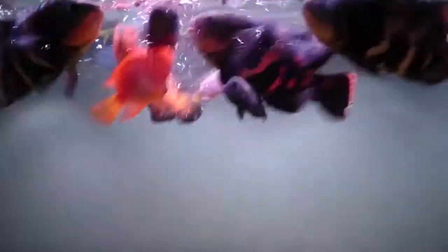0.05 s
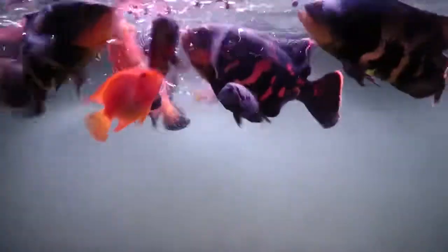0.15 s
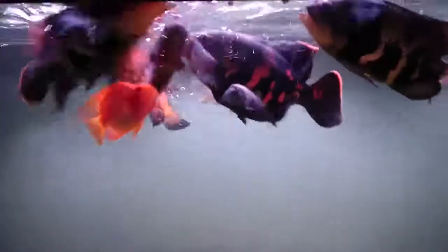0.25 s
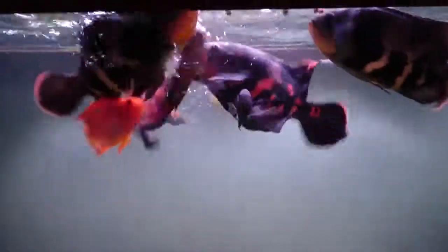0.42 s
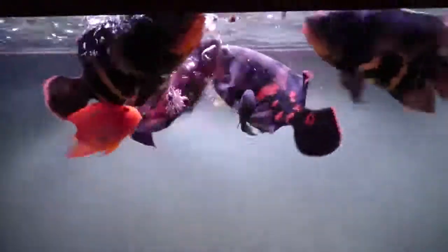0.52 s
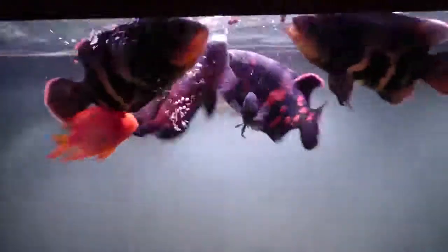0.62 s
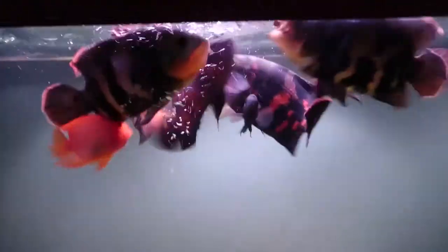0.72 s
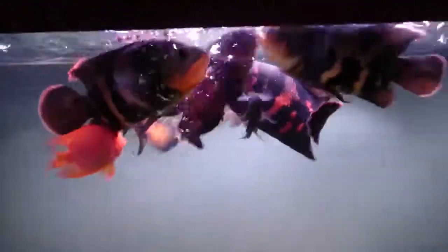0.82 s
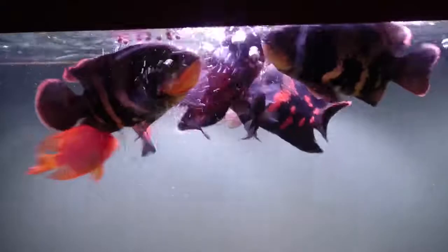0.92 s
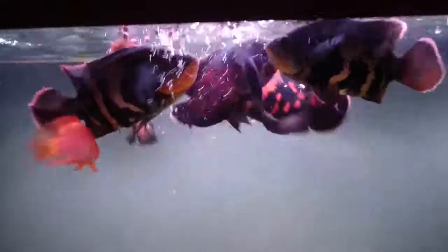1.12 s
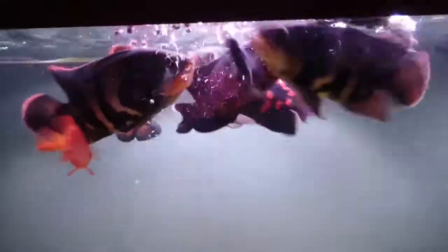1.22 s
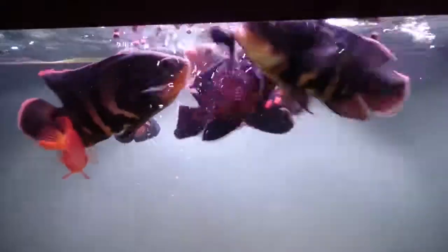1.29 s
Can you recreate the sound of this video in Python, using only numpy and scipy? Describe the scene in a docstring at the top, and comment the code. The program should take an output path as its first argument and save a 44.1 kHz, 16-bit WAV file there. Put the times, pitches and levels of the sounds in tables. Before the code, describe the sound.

Large fish splash and snap at the surface of an aquarium over faint equipment hiss

```python
"""Aquarium, feeding time: big fish lunge at the surface, throwing up short clouds of bubbles and spray.
Splashes, falling drops and single bubbles are damped sines; jaw snaps add a noise crack to the ring.
The air space over the water and a small hard room ring on. A filtered-noise thump bumps the tank.
Equipment hisses quietly as coloured noise; the left microphone is weak below the treble."""
import sys
import numpy as np
from scipy import signal
from scipy.fft import rfft, irfft, next_fast_len
from scipy.io import wavfile
from scipy.ndimage import map_coordinates

SR = 44100
rng = np.random.default_rng(int(sys.argv[2]) if len(sys.argv) > 2 else 0)


def file_out(sig):
    """Save sig as 16-bit WAV at sys.argv[1]."""
    # one column per channel
    cols = np.atleast_2d(sig).T
    # limit, then scale
    lim = np.clip(cols, -1, 1)
    pcm = np.round(lim * 32767).astype(np.int16)
    wavfile.write(sys.argv[1], SR, pcm)


N = 59535

# Source levels are ahead of the space and the tank colour.
# Water thrown by lunges. Each row: start in seconds, length in seconds, level in dB, centre pitch in Hz,
# pitch spread in octaves, ring of each tiny bubble in cycles per 60 dB.
SPLASH_CLOUDS = [(.177, 0.015, -42, 1680, 0.042, 24), (0.19, 0.018, -39.5, 5100, 0.47, 4.4),
                 (.2055, 0.011, -24.5, 846, 0.065, 15), (0.21, .016, -24.5, 1380, 0.31, 12),
                 (0.21, .016, -29.5, 3620, .09, 22), (.2115, 0.0099, -25.5, 6260, 0.59, 9.4),
                 (0.22, 0.0082, -25.5, 2160, 0.093, 18), (.238, .035, -32, 2040, 0.41, 14),
                 (.236, .04, -34, 3460, 0.12, 26), (0.299, .030, -37.5, 1820, 0.13, 6.7),
                 (.391, .016, -24.5, 1090, 0.732, 11.3), (.393, .014, -28.5, 873, 0.093, 17),
                 (.3915, 0.011, -25.5, 3460, 0.27, 9.5), (.3985, .004, -20.5, 6460, 0.41, 10.4),
                 (.42, .016, -32.5, 4300, 0.66, 2.5), (.418, 0.049, -30, 3620, 0.043, 68),
                 (.415, .04, -34, 3090, 0.044, 50), (0.49, 0.062, -45, 3450, 0.095, 60),
                 (0.77, 0.016, -27.5, 628, 0.62, 5.6), (.779, .018, -30.5, 747, .17, 22),
                 (0.78, .018, -25, 2810, 0.6, 12.8), (0.78, .010, -34, 9100, 0.43, 5.1),
                 (.784, .03, -32, 4240, 0.056, 36), (0.79, .030, -31, 3280, 0.67, 7.1),
                 (0.674, 0.028, -49, 7300, 0.053, 9.4), (1.216, 0.016, -42.5, 1600, 0.24, 15),
                 (1.212, 0.051, -44.5, 7730, 0.066, 10), (1.217, .013, -43.5, 3020, 0.042, 32),
                 (1.25, 0.015, -39, 960, 0.36, 13.5), (1.249, .028, -41.5, 3500, 0.15, 22),
                 (1.252, 0.055, -41, 4200, 0.044, 76), (1.264, 0.01, -41, 1700, 0.17, 13),
                 (1.236, 0.081, -39, 658, 0.018, 35), (1.287, 0.059, -47, 3700, 0.19, 12)]
# Jaw snaps and sharp slaps. Each row: start in seconds, level in dB, ring pitch in Hz,
# crack over the ring in dB.
JAW_SNAPS = [(0.2138, -38, 4700, 5), (0.2448, -33.5, 3380, -16), (.3985, -28, 3200, -24),
             (0.3998, -24, 3430, -4), (.402, -32.5, 3330, 4.5), (0.4113, -34, 3750, 0),
             (0.4219, -37, 3200, -7), (0.4287, -28, 3240, -22), (0.7856, -26, 3630, -9.5),
             (1.2603, -39.5, 4030, -9)]
# Single bubbles. Each row: start in seconds, level in dB, starting pitch in Hz, t60 in seconds.
SINGLE_BUBBLES = [(.187, -38.5, 1690, 0.014), (.209, -32, 850, 0.011), (.223, -41, 1660, 0.017),
                  (.555, -47.5, 3480, 0.0074), (.643, -50, 3720, 0.018), (.829, -38, 2475, 0.028),
                  (.997, -49, 681, 0.084), (1.226, -45.5, 3090, 0.027)]
# Drops falling back after big lunges. Each row: start in seconds, level of the first drops in dB.
DROP_SHOWERS = [(0.252, -41.5), (.43, -36.5), (0.799, -45)]
# Modes of the air space over the water. Each row: frequency in Hz, level in dB re HOOD_DB, t60 in seconds.
HOOD_MODES = [(342, 3, 0.16), (491.6, 2.5, 0.23), (852.5, 6.5, 0.2), (1265, 6, 0.29), (1522, -2, 0.28),
              (1617, 2, 0.31), (2195, 8.5, 0.35), (2508, 7, 0.18), (2920, 7, 0.39), (3200, 0.5, 0.25),
              (3510, 5, 0.61), (3664, 6, 0.26), (3730, 4, 0.4), (4660, 1, 0.22), (5350, -11, 0.43),
              (5780, 7, 0.21)]
# Reflections from the glass and the lid. Each row: mean delay in seconds, level in dB re the direct sound.
WALL_ECHOES = [(.0011, -19.5), (.0019, -8.5), (.0047, -8), (.0082, -11), (0.0124, -20), (0.0192, -17)]
# Decay of the room's tail. Each row: frequency in Hz, t60 in seconds.
ROOM_DECAY = [(200, 0.17), (530, 0.49), (1400, 0.43), (3600, 0.32), (9700, 0.33)]
# Colour of the water sounds. Each row: frequency in Hz, gain in dB.
TANK_COLOUR = [(100, -6.5), (250, -5.5), (500, -8), (800, -5), (1100, -7.5), (1600, 0), (1950, -5.5),
               (2200, -2), (2600, -3), (2820, -3), (3000, -0.5), (3800, -2), (4250, -3.5), (4700, -3),
               (5500, -7), (5800, -6), (7200, -6), (9500, -9), (11500, -20), (15000, -8)]
# Shape of the equipment noise spectrum. Each row: frequency in Hz, relative density in dB per Hz.
HISS_COLOUR = [(25, -14), (70, -10), (140, -15), (300, -8), (500, -1.5), (680, -0.5), (1050, 0), (1400, 2),
               (2300, 0), (3700, 1.5), (4200, -3.5), (4800, -17), (7500, -16), (10000, -24.5), (11500, -37),
               (15000, -25.5)]
# Slow swell of the equipment noise. Each row: time in seconds, gain in dB.
HISS_SWELL_POINTS = [(0, 1.5), (0.132, 2), (.25, 0.5), (.7, 0), (.9, 0.5), (1.1, -1), (1.35, 2)]
# Sensitivity of the left microphone. Each row: frequency in Hz, gain in dB.
LEFT_MIC_RESPONSE = [(120, -2), (300, -8), (700, -12.5), (1500, -15.5), (2500, -18), (5000, -16.5),
                     (5300, 0), (15000, 0)]

HISS_DB, HISS_WAVER_DB, HISS_WAVER_POINTS_PER_S = -53.5, 1.07, 25
GRAINS_PER_S, GRAIN_SCATTER_DB, GRAIN_ATTACK_CYCLES = 5000, 4.5, 0.21
SWELL_SHARE = 0.19  # part of a splash over which it builds from half to full strength
BUBBLE_RISE_PER_T60, BUBBLE_ATTACK_S = 0.049, 0.001  # rise as a fraction of the pitch
SNAP_T60_S, CRACK_T60_S, CRACK_TOP_HZ = 0.0035, 0.011, 6200
DRIZZLE_S, DRIZZLE_FADE_DB_PER_S, DROP_SCATTER_DB = 0.16, 85, 2
DROP_HZ, DROP_SPREAD_OCTAVES, DROP_CYCLES = 3240, 0.39, 5
THUMP_S, THUMP_DB, THUMP_T60_S, THUMP_TOP_HZ = 1.131, -58.5, 0.32, 218
THUMP_PAN_DB = 3  # left up, right down
HOOD_DB, ROOM_DB, ROOM_BUILD_S = -9, 0.5, 0.0054
WALL_SCATTER, LEFT_LAG_S = 0.11, 0.0003  # paths to the two microphones differ; scatter is a share of the delay
LOW_CUT_HZ = 556  # small splashes radiate little bass
ALIKE = 0.017  # left-right correlation of diffuse noise
TOP_HZ = 15500


def amp(db):
    """Decibels to gain."""
    return 10 ** (np.asarray(db) / 20)


def unit(x):
    """Scale to rms 1."""
    return x / np.sqrt(np.mean(x ** 2) + 1e-20)


def burst(x):
    """Scale a short sound to the energy of 10 ms at rms 1."""
    return x / np.sqrt(np.sum(x ** 2) / (SR / 100) + 1e-20)


def along(points, hz):
    """Read (Hz, value) points on a log axis."""
    f, v = np.transpose(points)
    return np.interp(np.log(hz + 1), np.log(f + 1), v)


def fade(t, t60):
    """Exponential decay, 60 dB in t60."""
    return np.exp(-np.log(1000) * t / t60)


def add(track, s, x):
    """Mix x into the track at time s."""
    part = track[max(round(s * SR), 0):][:len(x)]
    part += x[:len(part)]


def coloured(x, points):
    """Minimum-phase filter, by folded cepstrum, with a gain of (Hz, dB) points."""
    m = 2 * next_fast_len(N)
    gain = amp(along(points, np.fft.rfftfreq(m, 1 / SR)))
    cepstrum = irfft(np.log(gain), m)
    cepstrum[1:m // 2] *= 2
    cepstrum[m // 2 + 1:] = 0
    return irfft(rfft(x, m) * np.exp(rfft(cepstrum)), m)[..., :N]


def diffuse(size):
    """White noise for two microphones, correlated by ALIKE."""
    a, b = rng.standard_normal((2, size))
    u = np.arccos(ALIKE) / 2
    shared, opposed = np.cos(u) * a, np.sin(u) * b
    return np.array([shared + opposed, shared - opposed])


def equipment():
    """Equipment rush: coloured noise with a slow swell and a slight random waver in level."""
    waver = map_coordinates(rng.standard_normal(size=64), [np.arange(N) * HISS_WAVER_POINTS_PER_S / SR])
    swell_db = np.interp(np.arange(N) / SR, *np.transpose(HISS_SWELL_POINTS))
    level = amp(HISS_DB + swell_db + HISS_WAVER_DB * waver)
    return level * unit(coloured(diffuse(N), HISS_COLOUR))


def grain(t, hz, cycles):
    """One tiny bubble or drop: a damped sine with a soft start."""
    attack = 1 - np.exp(-t * hz / GRAIN_ATTACK_CYCLES)
    return burst(np.sin(2 * np.pi * hz * t) * fade(t, cycles / hz) * attack)


def splashes():
    """Each splash is a swelling cloud of tiny damped bubbles at its own spot on the surface."""
    out, t = np.zeros((2, N)), np.arange(SR // 25) / SR
    for s, length, db, centre_hz, spread, cycles in SPLASH_CLOUDS:
        when = rng.random(size=256)  # share of the splash length
        pitch, strength, sign = rng.standard_normal((3, len(when)))
        swell = np.minimum(0.5 + when / (2 * SWELL_SHARE), 1)
        size = np.sign(sign) * amp(GRAIN_SCATTER_DB * strength) * swell
        cloud, spot = np.zeros(SR // 6), np.zeros(N)
        for k in range(int(np.clip(length * GRAINS_PER_S, 1, len(when)))):
            hz = min(centre_hz * 2 ** (spread * pitch[k]), TOP_HZ)
            add(cloud, when[k] * length, size[k] * grain(t, hz, cycles))
        add(spot, s, amp(db) * burst(cloud))
        out += space(spot)
    return out


def space(x):
    """Direct sound, near reflections, the ringing air space and the room's tail, new paths at each call."""
    t = np.arange(SR // 2) / SR
    hz, frames, z = signal.stft(diffuse(len(t)), SR, nperseg=256)
    z = z * fade(frames, along(ROOM_DECAY, hz)[:, None])
    tail = signal.istft(z, SR, nperseg=256)[1][:, :len(t)]
    tail *= 1 - np.exp(-t / ROOM_BUILD_S)
    response = amp(ROOM_DB) * tail / np.linalg.norm(tail[0])
    for side, lag in zip(response, (LEFT_LAG_S, 0)):
        add(side, lag, np.ones(1))  # direct sound
        for delay, db in WALL_ECHOES:
            add(side, delay * (1 + WALL_SCATTER * rng.standard_normal()), amp([db]))
        for f, db, t60 in HOOD_MODES:
            mode = np.sin(2 * np.pi * (f * t + rng.random())) * fade(t, t60)
            per_sample = 10 * np.log(1000) / (t60 * SR)  # equal peak gain for any t60
            side += amp(HOOD_DB + db) * per_sample * mode
    return signal.fftconvolve(x[None], response, axes=1)[:, :N]


def bubbles():
    """Larger bubbles start softly, ring alone and rise a little in pitch."""
    out, t = np.zeros(N), np.arange(SR // 8) / SR
    for s, db, hz, t60 in SINGLE_BUBBLES:
        phase = 2 * np.pi * hz * (t + BUBBLE_RISE_PER_T60 * t ** 2 / (2 * t60))
        attack = 1 - np.exp(-(t / BUBBLE_ATTACK_S) ** 2)
        add(out, s, amp(db) * burst(np.sin(phase) * fade(t, t60) * attack))
    return out


def snaps():
    """A jaw shuts: a broad noise crack and a short damped ring."""
    out, t = np.zeros(N), np.arange(SR // 50) / SR
    soften = signal.butter(2, CRACK_TOP_HZ, fs=SR, output='sos')
    for s, db, hz, crack_db in JAW_SNAPS:
        ring = burst(np.sin(2 * np.pi * hz * t) * fade(t, SNAP_T60_S))
        noise = rng.standard_normal(len(t)) * fade(t, CRACK_T60_S)
        crack = burst(signal.sosfilt(soften, np.diff(noise, prepend=0)))
        add(out, s, amp(db) * (ring + amp(crack_db) * crack))
    return out


def drizzle():
    """Scattered drops fall back, on the whole ever fainter, each a short damped ring."""
    out, t = np.zeros(N), np.arange(SR // 50) / SR
    for s, first_db in DROP_SHOWERS:
        times = rng.random(size=12) * DRIZZLE_S
        for when, pitch, strength in zip(times, *rng.standard_normal(size=(2, 12))):
            hz = min(DROP_HZ * 2 ** (DROP_SPREAD_OCTAVES * pitch), TOP_HZ)
            db = first_db - DRIZZLE_FADE_DB_PER_S * when + DROP_SCATTER_DB * strength
            add(out, s + when, amp(db) * grain(t, hz, DROP_CYCLES))
    return out


def thump():
    """A body bumps the tank: faint decaying low-band noise, a little different at each microphone."""
    out, t = np.zeros((2, N)), np.arange(SR // 4) / SR
    dull = signal.butter(2, [THUMP_TOP_HZ / 5, THUMP_TOP_HZ], 'band', fs=SR, output='sos')
    lows = signal.sosfilt(dull, diffuse(len(t)))
    for side, low, pan_db in zip(out, lows, (THUMP_PAN_DB, -THUMP_PAN_DB)):
        add(side, THUMP_S, amp(THUMP_DB + pan_db) * unit(low) * fade(t, THUMP_T60_S))
    return out


def scene():
    """The feeding sounds in their space, with the thump, over the equipment noise."""
    water = splashes() + space(snaps()) + space(bubbles() + drizzle())
    low_cut = signal.butter(2, LOW_CUT_HZ, 'high', fs=SR, output='sos')
    water = signal.sosfilt(low_cut, water)
    return coloured(water, TANK_COLOUR) + thump() + equipment()


def record(dry):
    """An uneven microphone pair and the recorder's band limit."""
    pair = np.array([coloured(dry[0], LEFT_MIC_RESPONSE), dry[1]])
    m = 2 * next_fast_len(N)
    passband = np.fft.rfftfreq(m, 1 / SR) < TOP_HZ
    return irfft(rfft(pair, m) * passband, m)[:, :N]


dry = scene()
out = record(dry)
file_out(out)
```